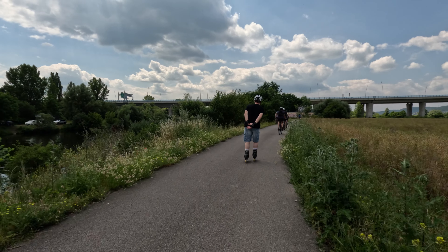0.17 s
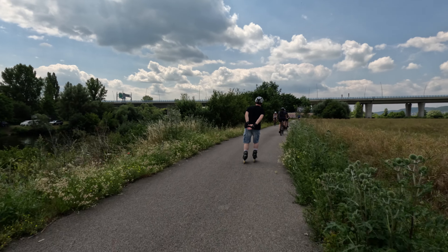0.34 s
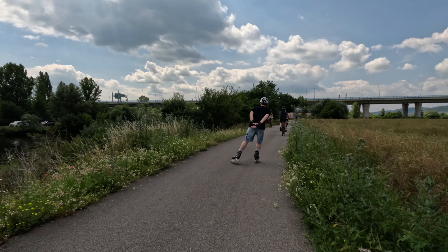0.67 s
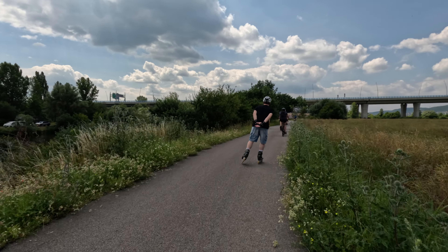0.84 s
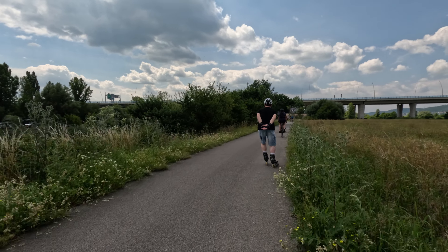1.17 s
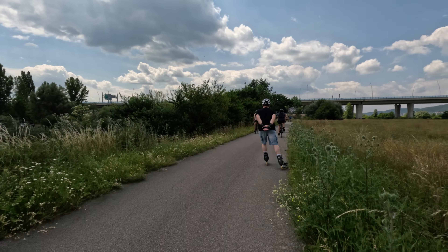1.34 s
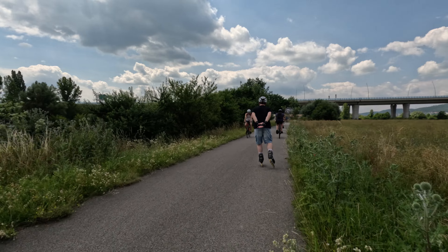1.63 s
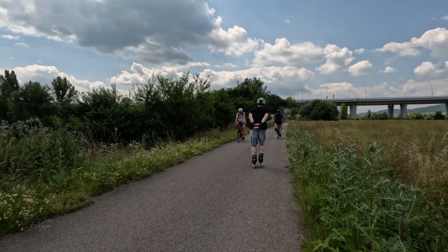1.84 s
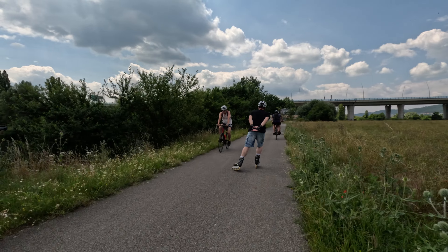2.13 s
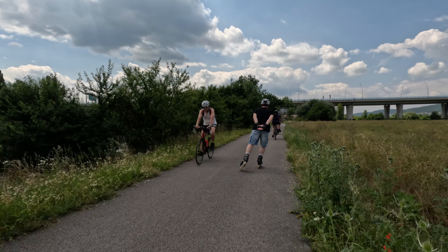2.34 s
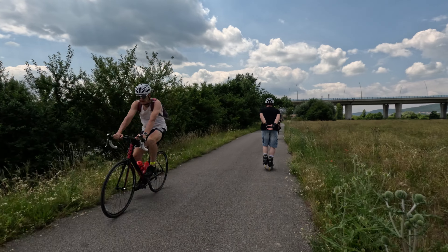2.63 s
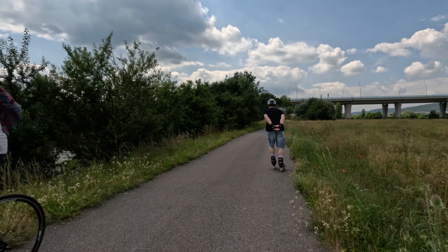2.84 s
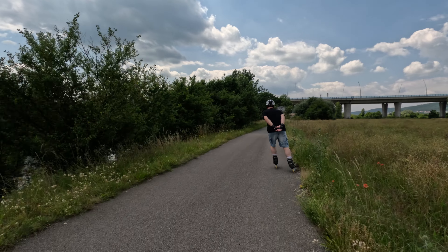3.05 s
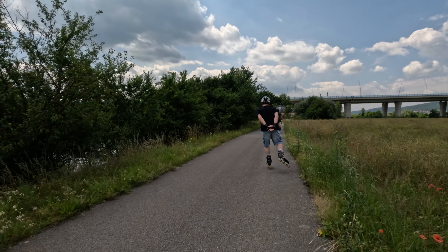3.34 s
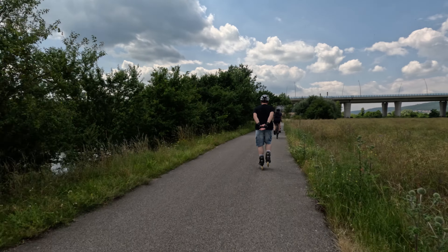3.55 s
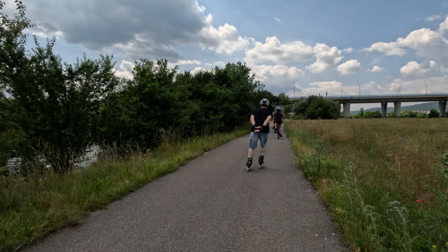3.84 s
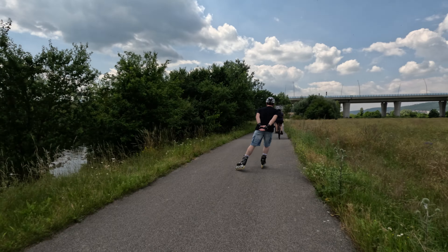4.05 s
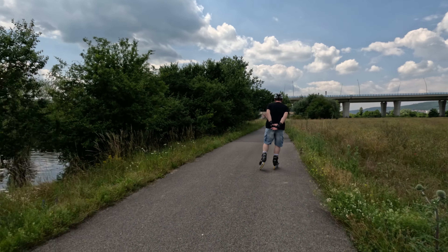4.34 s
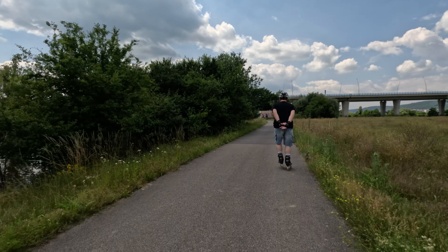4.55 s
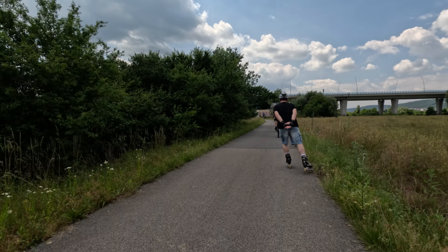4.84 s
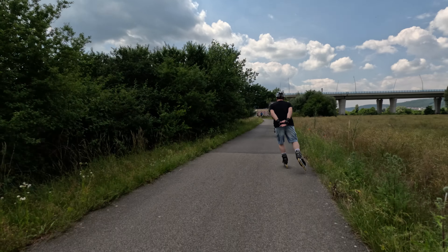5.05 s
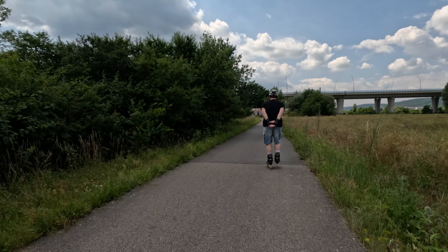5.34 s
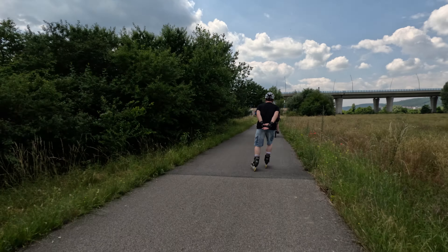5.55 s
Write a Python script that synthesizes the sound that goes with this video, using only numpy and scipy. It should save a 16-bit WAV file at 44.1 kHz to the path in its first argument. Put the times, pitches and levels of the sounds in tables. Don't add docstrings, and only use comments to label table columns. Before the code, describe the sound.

Skate wheels drone and judder along a rough path; loose parts clatter, a sharp jolt jingles thin metal, and tiny bird chips show faintly.

```python
import sys
import numpy as np
from scipy import signal
from scipy.fft import rfft, irfft
from scipy.io import wavfile
from scipy.ndimage import uniform_filter1d

SR = 44100
rng = np.random.default_rng(int(sys.argv[2]) if len(sys.argv) > 2 else 0)


def wav_record(signal):
    frames = np.transpose(np.atleast_2d(signal))
    bounded = np.clip(frames, -1, 1)
    quanta = np.round(bounded * 32767).astype(np.int16)
    wavfile.write(sys.argv[1], SR, quanta)


def field_ratio(decibels):
    return 10 ** (np.asarray(decibels, dtype=float) / 20)


N = 251370
T = np.arange(N) / SR
COARSE = T[::64]

# (time [s], coarseness [dB], unevenness [dB])
ROAD = [(0.1, -39.5, -23), (0.57, -40, -32.5), (0.82, -37.5, -32), (0.87, -36, -20), (1.05, -40, -32),
        (2.11, -39.5, -32.5), (2.29, -37.5, -24), (2.34, -43, -33.5), (2.43, -40, -32), (3.18, -45.5, -26),
        (3.19, -43, -30.5), (4.59, -42.5, -29.5), (5.34, -39, -23), (5.6, -40, -33)]
# (time [s], frequency [Hz])
MAIN_HZ = [(0, 135.3), (.5, 138), (.75, 145), (1.3, 143), (1.65, 146.8), (1.9, 137.4), (2.13, 132.7),
           (2.4, 144), (2.6, 136.9), (2.9, 142), (3.05, 146.2), (3.4, 143.2), (3.7, 139.7), (4.1, 135.9),
           (4.3, 128.3), (4.5, 142.8), (4.75, 137.4), (5.7, 139.8)]
MAIN_WIDTH_HZ, MAIN_STEADY, JUDDER_STEADY = 20.9, 0.41, 0.66
MAIN_DB, JUDDER_DB, FRAME_DB, ROAR_DB, BED_DB, HISS_DB = -20.5, -27, -23.5, -37.5, -22.5, -56.5
# (time [s], gain [dB])
SURGES = [(.76, 3.5), (.95, 4), (1.08, 5), (1.27, 7), (1.4, 4), (1.55, 1), (1.66, 5.5), (1.92, 7),
          (2.11, 0.5), (2.28, 4.5), (2.37, 5), (2.44, 5), (2.57, 1), (2.64, 5), (2.897, 7.5), (3.04, 7),
          (3.12, 6), (3.23, 7.5), (3.4, 6.5), (3.55, 3.5), (3.75, -0.5), (3.93, 4.5), (4.15, 0), (4.66, 4),
          (5.1, 4), (5.32, 2.5), (5.5, 2), (5.65, 7.5), (4.07, 7), (4.5, 6.5), (4.81, 5.5), (4.96, 2)]
# (time [s], loss [dB])
CRACKS = [(.05, 2.5), (.2, 4), (.4, 7.5), (.68, -1.5), (1.45, 0), (1.71, 3.5), (1.78, 10), (2.0, 15),
          (2.21, 10), (2.33, 1.5), (2.51, 9.5), (2.74, 0), (3.185, 7), (3.45, 12), (3.99, 18), (4.3, 0),
          (4.56, 15), (4.61, 11.5), (5.06, 15), (5.25, 8.5), (5.58, -1.5), (4.76, 3), (4.87, 7)]
SURGE_S, CRACK_S = 0.05, 0.02
SURGE_JUDDER, SURGE_FRAME, SURGE_ROAR = -0.41, -0.048, -0.29
CRACK_JUDDER, CRACK_FRAME, CRACK_ROAR = 0.07, 0.1, 0.16
CHOKE_FROM_S, CHOKE_TO_S, CHOKE_DB = 2.916, 2.995, 12.5
# (frequency [Hz], width [Hz], level [dB], left minus right [dB])
FRAME = [(203.9, 27, -3.5, 5), (288.3, 11, -1, -6.5), (315.8, 24, -2, -2.5), (419.7, 48, -4.5, -4),
         (482.6, 52, -5, 2.5), (558.6, 28, -10, -5.5), (710, 120, -8, 2)]
# (frequency [Hz], width [Hz], level [dB], left minus right [dB])
ROAR = [(1080, 272, 5, 3), (1258, 130, -0.5, 3.5), (1450, 230, -3.5, -7), (1657, 170, -0.5, 5.5),
        (2110, 240, -13, -9)]
# (frequency [Hz], density [dB per Hz])
JUDDER = [(8.8, -46.5), (15, -17), (46, 2), (65, 7.5), (82, -3), (102, 6), (110, -16), (140, -46.5),
          (240, -120)]
# (frequency [Hz], density [dB per Hz])
BED = [(59, -33), (100, -7.5), (190, -4), (450, -13.5), (700, -16), (1000, -28.5), (1500, -24.5),
       (2100, -36), (2800, -61.5), (3500, -92)]
# (frequency [Hz], side minus mid [dB])
APART = [(60, -20), (91, -15.5), (140, -23.5), (210, -16.5), (320, -7.5), (490, -13.5), (740, -7.5),
         (1130, -6.5), (1710, -5.5), (2600, -2), (4000, 0.5), (8000, -2), (13000, -1.5)]
# (time [s], length [s], level [dB], frequency [Hz])
PLATE = [(0.013, 0.035, -26, 391.1), (0.135, 0.026, -33, 382.7), (0.33, 0.036, -32.5, 390.9),
         (0.605, 0.076, -26.5, 392.8), (0.845, 0.098, -33.5, 376.7), (1.164, 0.04, -31, 379.6),
         (2.027, 0.026, -33, 392.4), (2.205, 0.049, -34.5, 395.5), (2.806, 0.074, -34.5, 381.3),
         (2.93, 0.068, -27.5, 373.3), (3.154, 0.032, -26, 379.3), (3.514, 0.13, -36.5, 376.8),
         (3.744, 0.087, -31.5, 391.9), (3.911, 0.028, -28, 382.1), (3.983, 0.062, -30.5, 386.8),
         (4.124, 0.03, -26.5, 379.1), (4.209, 0.085, -36.5, 386.0), (4.394, 0.042, -28.5, 358.1),
         (4.555, 0.12, -27.5, 381.0), (4.729, 0.076, -29.5, 382.5), (4.85, 0.035, -29, 382.8),
         (5.022, 0.3, -28.5, 390.0), (5.449, 0.12, -31.5, 368.5)]
PLATE_REST_DB, PLATE_WIDTH_HZ, PLATE_LR_DB = -39, 25.3, -3.5
# (time [s], length [s], level [dB], frequency [Hz])
FORK = [(0.041, 0.065, -28.5, 622.8), (0.168, 0.048, -37, 592.2), (0.484, 0.058, -32, 588.6),
        (0.591, 0.035, -32, 621), (0.663, 0.16, -30.5, 636.3), (0.914, 0.027, -27.5, 609.6),
        (1.114, 0.04, -34, 616.7), (1.203, 0.053, -28.5, 616.9), (1.312, 0.034, -23, 614.1),
        (1.508, 0.13, -37, 605), (1.732, 0.038, -28, 617.3), (1.931, 0.16, -36.5, 609),
        (2.11, 0.066, -37, 635), (2.195, 0.098, -38, 597.1), (2.331, 0.03, -25, 616.5),
        (2.466, 0.097, -36, 617.9), (2.798, 0.06, -34.5, 608.3), (2.919, 0.097, -36, 626.6),
        (3.461, 0.03, -25, 612.4), (3.577, 0.13, -32.5, 623.5), (3.794, 0.028, -31, 625),
        (3.956, 0.047, -25.5, 613.6), (4.039, 0.24, -33.5, 600.6), (4.355, 0.038, -28, 599.9),
        (4.436, 0.058, -32, 618), (4.746, 0.066, -29, 604), (4.896, 0.047, -28.5, 613.4),
        (4.986, 0.04, -25.5, 602), (5.054, 0.034, -29.5, 623), (5.327, 0.045, -30, 628.4),
        (5.493, 0.059, -34, 629)]
FORK_REST_DB, FORK_WIDTH_HZ, FORK_LR_DB = -36.5, 21, -1
# (time [s], length [s], level [dB], frequency [Hz])
STEM = [(0.133, 0.069, -25, 268), (0.256, 0.13, -25.5, 227), (0.408, 0.3, -25.5, 233),
        (0.774, 0.044, -17.5, 234.4), (0.888, 0.072, -28, 240.3), (1.005, 0.17, -24, 234.9),
        (1.313, 0.029, -27.5, 233.4), (1.362, 0.084, -27, 244.3), (1.542, 0.078, -23.5, 227.5),
        (1.691, 0.12, -27.5, 245.3), (1.853, 0.053, -29, 232.8), (1.958, 0.16, -25.5, 246.6),
        (2.162, 0.034, -21.5, 253.5), (2.231, 0.126, -31.5, 250), (2.541, 0.072, -28, 263),
        (2.785, 0.033, -20.5, 224.6), (2.852, 0.064, -19.5, 237.1), (2.974, 0.03, -29.5, 272.3),
        (3.548, 0.06, -29, 237.7), (3.835, 0.055, -25, 222), (3.97, 0.036, -18.5, 246.7),
        (4.117, 0.034, -19, 238.1), (4.298, 0.066, -21.5, 225), (4.447, 0.039, -19, 209.7),
        (4.57, 0.096, -30.5, 245), (4.965, 0.05, -21.5, 255), (5.298, 0.088, -23.5, 246.2)]
STEM_REST_DB, STEM_WIDTH_HZ, STEM_LR_DB = -31.5, 22.7, 0.5
# (time [s], length [s], level [dB], frequency [Hz])
HUB = [(0.214, 0.054, -39.5, 1685), (0.297, 0.06, -43, 1668), (0.365, 0.082, -46.5, 1668),
       (0.457, 0.074, -43, 1678), (0.542, 0.1, -45, 1687), (0.721, 0.088, -44.5, 1681),
       (0.827, 0.031, -49, 1677), (0.877, 0.038, -45.5, 1679), (0.934, 0.041, -40.5, 1650),
       (1.032, 0.04, -42.5, 1689), (1.185, 0.076, -44, 1675), (1.436, 0.032, -44, 1667),
       (1.473, 0.031, -43, 1683), (1.545, 0.06, -48.5, 1680), (1.697, 0.068, -42.5, 1702),
       (1.795, 0.12, -43.5, 1674), (1.978, 0.14, -43.5, 1700), (2.155, 0.138, -43, 1680),
       (2.386, 0.034, -46, 1665), (2.525, 0.054, -40, 1686), (2.714, 0.054, -42, 1719),
       (2.837, 0.058, -43, 1650), (2.907, 0.15, -41.5, 1646), (3.127, 0.036, -44.5, 1641),
       (3.311, 0.174, -42, 1671), (3.592, 0.08, -43.5, 1682), (3.696, 0.076, -47.5, 1682),
       (3.795, 0.03, -43.5, 1654), (3.872, 0.086, -43, 1707), (3.968, 0.042, -43, 1643),
       (4.042, 0.036, -44, 1693), (4.129, 0.038, -41.5, 1680), (4.232, 0.078, -42, 1690),
       (4.368, 0.03, -44.5, 1666), (4.408, 0.04, -42.5, 1690), (4.724, 0.039, -44, 1710),
       (4.911, 0.052, -43, 1680), (5.069, 0.042, -44, 1646), (5.197, 0.092, -44.5, 1670),
       (5.276, 0.102, -41, 1712)]
HUB_REST_DB, HUB_WIDTH_HZ, HUB_LR_DB = -50, 80, 4
SING_EDGE_S, SING_STEADY = 0.016, 0.75
# (time [s], peak [dB])
BUMPS = [(0.095, -40.5), (0.396, -38), (0.7691, -43.5), (1.365, -38.5), (1.741, -33), (2.0002, -52),
         (2.171, -44.5), (2.47, -47.5), (3.851, -42.5), (3.95, -41.5), (4.0287, -39), (4.578, -45.5),
         (4.645, -50.5), (4.769, -44.5), (4.99, -42.5), (5.078, -42), (5.13, -46), (5.186, -44),
         (5.229, -38.5), (5.551, -40.5)]
BUMP_THUD_DB, BUMP_BRIGHT_DB, BUMP_S = 21.5, -19, 0.038
# (time [s], peak [dB], thud [dB], bright share [dB])
JOLT = [(2.6494, -44.5, 9, -5.5), (2.724, -29, 9, -33.5), (2.795, -39, 24.5, -18.5),
        (2.818, -36.5, 22.5, -14), (2.745, -46, 12.5, -29), (2.896, -30.5, 2.5, -5.5),
        (2.9127, -21, 20, -16), (2.939, -28.5, 23, -9.5), (2.959, -35, 15, -14.5),
        (2.976, -33.5, 12.5, -12.5), (2.996, -35, 16.5, -18), (3.037, -34.5, -2.5, -4.5),
        (3.0743, -30.5, 5.5, -13.5), (3.145, -28.5, 23.5, -10.5), (3.164, -39.5, 23.5, -13),
        (3.185, -40.5, 25, -15), (3.204, -40.5, -1, -26), (3.268, -38, 3, -5.5), (3.285, -46, 20.5, -15.5),
        (3.322, -39.5, 27, -25.5)]
JOLT_S = 0.03
# (frequency [Hz], density [dB per Hz])
CLATTER = [(900, -19), (1800, 3.5), (2700, 1), (3300, -6), (4000, -8), (5500, -11), (7500, -22.5),
           (10000, -47.5)]
# (frequency [Hz], density [dB per Hz])
JINGLE = [(4000, -22.5), (6300, -1.5), (7000, 0), (8800, -9), (10000, -2), (11500, -13), (12000, -24),
          (16000, -50.5)]
# (frequency [Hz], density [dB per Hz])
THUD = [(150, -19), (300, 0.5), (500, 9.5), (700, 11), (1000, 1.5), (1450, -0.5), (2100, -20.5),
        (3000, -44.5)]
# (time [s], frequency [Hz], level [dB], t60 [s])
BLOWS = [(1.762, 1135, -26, .05), (2.725, 1773, -26, 0.038), (2.728, 2646, -34.5, 0.06),
         (2.748, 1810, -28, .04), (2.749, 2740, -39.5, .06), (2.889, 268, -13.5, 0.16),
         (2.918, 2100, -27.5, 0.073), (2.92, 740, -18.5, 0.053), (2.922, 338, -17, 0.053),
         (2.93, 986, -17.5, .05), (2.938, 730, -21.5, .05), (2.951, 1430, -25, 0.036),
         (2.947, 556, -23, 0.05), (2.95, 1360, -25, 0.0399), (2.955, 510, -15, 0.098),
         (2.961, 743.5, -20.5, .04), (2.979, 248, -10.5, 0.13), (2.982, 606, -12.5, 0.033),
         (2.787, 259, -14.5, 0.09), (2.8, 621, -25, 0.054), (2.856, 624, -19.5, 0.068),
         (3.008, 694, -20.5, .05), (2.984, 925, -20, 0.048), (3.165, 1450, -26, 0.12),
         (3.168, 690, -21, 0.072), (3.172, 2040, -33.5, 0.072)]
# (time [s], frequency [Hz], level [dB], t60 [s])
PINGS = [(2.903, 7750, -51, .06), (2.912, 8600, -52, .08), (2.915, 6300, -45, .15), (2.945, 6150, -45, .15),
         (2.985, 6150, -48, .1), (3.048, 6450, -48, .15), (3.075, 6170, -49, .15), (3.048, 9950, -55, .2),
         (3.156, 7450, -55, .15), (3.2, 7450, -61, .15), (3.264, 4900, -54, .08), (3.282, 6400, -47, .1),
         (3.272, 10000, -56, .1), (2.985, 3213, -45, .3), (3.018, 3213, -48, .3)]
# (time [s], peak [dB], frequency [Hz])
KNOCKS = [
    (1.318, -19.5, 610),
    (1.623, -18.5, 641),
    (2.421, -13, 504),
    (4.046, -10.5, 538),
    (4.526, -24.5, 603),
    (4.909, -20.5, 626),
    (5.214, -13, 601),
]
KNOCK_T60_S, KNOCK_DB = 0.03, -5
DISC_HZ = [915, 1621, 2396, 3213, 4238, 6152, 6400, 7452, 8650, 9895, 11420]
# (level [dB], t60 [s], left minus right [dB])
DISC = [(-2, 5, 13), (0.5, 0.55, 11), (3, 0.54, 2), (-3, 0.2, -5), (-2, 0.26, 13), (-4.5, 0.12, 1),
        (-9, 0.075, -4), (-9, 0.18, -1), (-9.5, 0.08, -3), (-9.5, .055, -2), (-8.5, 0.05, -4)]
# (time [s], low modes [dB], high modes [dB])
RATTLE = [(2.905, -62.5, -50), (2.916, -46.5, -39), (2.947, -40, -42), (2.984, -52.5, -43.5),
          (3.051, -43.5, -45.5), (3.066, -52, -50.5), (3.14, -47, -51), (3.171, -43.5, -59),
          (3.206, -58.5, -58.5), (3.276, -58.5, -49.5), (3.297, -60, -53.5), (3.335, -61.5, -58.5),
          (3.35, -63, -62)]
RATTLE_S, REST_S, JOG_RAD = 0.019, 3.42, 0.65
# (time [s], length [s], loss [dB])
TOUCHES = [
    (2.952, .012, 4),
    (3.02, .022, -2),
    (3.116, .025, -2),
    (3.222, 0.044, 7.5),
]
# (time [s], length [s], level [dB], fading [dB per s])
CHINKS = [(2.907, .012, -40.5, 2), (2.915, .036, -35, 0), (2.962, .02, -49, 3), (2.987, .016, -38, 100),
          (3, .03, -43.5, 150), (3.036, .018, -51.5, 0), (3.056, .04, -42, 100), (3.099, .015, -52.5, 100),
          (3.14, .012, -51, 0), (3.151, .025, -45, 0), (3.18, .014, -58.5, 0), (3.197, .027, -53, 0),
          (3.268, .014, -52.5, 0), (3.284, .03, -48, 0), (3.314, 0.032, -52.5, 50), (3.356, .02, -60, 200)]
CHINK_HZ, CHINK_EDGE_S, CHINK_WANDER_HZ, CHINK_LR_DB = 5232, 0.0035, 30, -3
# (frequency [Hz], density [dB per Hz])
HISS = [(1500, -10.5), (2500, -7), (3500, -2.5), (5000, -5.5), (7000, -7), (8500, -11), (10500, -15.5),
        (12500, -20), (15000, -23.5), (15700, -16), (17000, -42)]
# (multiple of BUZZ_HZ, level [dB])
BUZZ = [(13, -80), (14, -80), (16, -79), (17, -80), (19, -75), (20, -75), (52, -85)]
BUZZ_HZ = 300
# (time [s], length [s], start frequency [Hz], end frequency [Hz], level [dB])
CHIPS = [
    (1.393, .028, 4920, 4850, -57),
    (1.77, .025, 5150, 4800, -54),
    (1.783, .013, 4600, 4500, -56),
    (4.995, .068, 4920, 4880, -56.5),
]
# (time [s], length [s], start frequency [Hz], end frequency [Hz], level [dB])
CHURRS = [
    (.862, .045, 4900, 4950, -57),
    (1.553, .045, 5750, 5500, -61),
    (1.735, .025, 4800, 4950, -55),
    (5.183, .048, 4800, 5000, -57),
    (5.232, .04, 4950, 5000, -57),
    (5.548, .03, 5000, 4950, -57),
]
WARBLE_HZ, CHURR_HZ = 120, 340


def unit(x):
    return x / np.sqrt(np.mean(x ** 2))


def on_log(hz, table):
    at, value = np.transpose(table)
    return np.interp(np.log(hz + 1), np.log(at), value)


def shaped(x, table):
    gain = field_ratio(on_log(np.fft.rfftfreq(N, 1 / SR), table))
    return irfft(rfft(x) * gain, N)


def colour(x, table):
    return unit(shaped(x, table))


def pair(make):
    side = shaped(make(), APART)
    return make() + side * np.array([[1], [-1]])


def pan(lr_db):
    return field_ratio(np.array([[lr_db], [-lr_db]]) / 2)


def walk(rate):
    k = int(SR / rate)
    steps = np.repeat(rng.standard_normal(N // k + 1), k)
    return unit(uniform_filter1d(uniform_filter1d(steps, k), k)[:N])


def held(start, length, edge_s):
    rise = np.tanh((COARSE - start) / edge_s)
    fall = np.tanh((COARSE - start - length) / edge_s)
    return (rise - fall) / 2


def humps(table, width_s):
    return np.interp(T, COARSE, sum(db * np.exp(-((COARSE - s) / width_s) ** 2) for s, db in table))


def burst(s, length):
    out, first = np.zeros(N), int(s * SR) + 1
    age = T[first:first + SR // 4] - s
    rise = 1 - np.exp(-age / 0.0068)
    out[first:first + len(age)] = rise * np.exp(-(age / max(length, 0.005)) ** 1.15)
    return out


def even_out(x, share, seconds):
    swing = np.sqrt(uniform_filter1d(unit(x.mean(axis=0)) ** 2, int(seconds * SR)) + 0.01)
    return unit(x / swing ** np.clip(share, 0, 1))


def stones(per_s, spread_db):
    hits = rng.random(N) < per_s / SR
    return hits * rng.standard_normal(N) * field_ratio(spread_db * rng.exponential(size=N))


def coarseness_db(axis=1):
    road_db = np.interp(T, np.transpose(ROAD)[0], np.transpose(ROAD)[axis])
    return road_db - np.median(road_db)


def resonance(x, hz, width):
    lead = np.concatenate([x[..., -SR // 8:], x], axis=-1)
    return signal.lfilter(*signal.iirpeak(hz, hz / width, SR), lead)[..., -N:]


def drifting(hz, width):
    keep = np.exp(-np.pi * width / SR)
    count = N + SR // 4
    drive = rng.standard_normal(count) + 1j * rng.standard_normal(count)
    swing = signal.lfilter([1], [1, -2 * keep, keep ** 2], drive)[-N:]
    return unit(np.real(swing * np.exp(2j * np.pi * np.cumsum(hz) / SR)))


def main_mode():
    ring = pair(lambda: drifting(np.interp(T, *np.transpose(MAIN_HZ)), MAIN_WIDTH_HZ))
    return even_out(ring, MAIN_STEADY, 0.027)


def modes(table, flicker_db, rate):
    road = pair(lambda: stones(6000, 0.8))
    out = 0
    for hz, width, db, lr in table:
        ring = resonance(resonance(road, hz, 1.8 * width), hz, 1.68 * width)
        out = out + pan(lr) * field_ratio(db + flicker_db * walk(rate)) * unit(ring)
    return unit(out)


def singing(table, rest_db, width, lr_db):
    start, length, db, hz = np.transpose(table)
    swells = sum(field_ratio(d) * held(s, n, SING_EDGE_S) for s, n, d in zip(start, length, db))
    size = field_ratio(rest_db) + np.interp(T, COARSE, swells)
    ring = pair(lambda: drifting(np.interp(T, start + length / 2, hz), width))
    return size * pan(lr_db) * even_out(ring, SING_STEADY, 0.05)


def rolling():
    road_db = coarseness_db()
    surge, crack = humps(SURGES, SURGE_S), humps(CRACKS, CRACK_S)
    choke = np.interp(T, COARSE, held(CHOKE_FROM_S, CHOKE_TO_S - CHOKE_FROM_S, 0.0026))
    main_db = MAIN_DB + surge - crack - CHOKE_DB * choke
    judder_db = JUDDER_DB + SURGE_JUDDER * surge + CRACK_JUDDER * crack
    judder_db = judder_db + 0.5 * coarseness_db(axis=2) + 0.42 * walk(12)
    frame_db = FRAME_DB + 0.4 * road_db + SURGE_FRAME * surge + CRACK_FRAME * crack + 0.3 * walk(20)
    grit_db = 0.27 * road_db + SURGE_ROAR * surge + CRACK_ROAR * crack + 0.21 * walk(8.6)
    bed_db = BED_DB + 0.69 * grit_db + 1.5 * walk(6.34)

    main = field_ratio(main_db) * main_mode()
    judder = even_out(pair(lambda: colour(rng.standard_normal(N), JUDDER)), JUDDER_STEADY, 0.11)
    frame = field_ratio(frame_db) * modes(FRAME, 1.4, 12)
    roar = field_ratio(ROAR_DB + grit_db) * modes(ROAR, 0.95, 16)
    bed = unit(pair(lambda: colour(stones(9000, 1.8), BED)))
    plate = singing(PLATE, PLATE_REST_DB, PLATE_WIDTH_HZ, PLATE_LR_DB)
    fork = singing(FORK, FORK_REST_DB, FORK_WIDTH_HZ, FORK_LR_DB)
    stem = singing(STEM, STEM_REST_DB, STEM_WIDTH_HZ, STEM_LR_DB)
    return main + field_ratio(judder_db) * judder + frame + plate + fork + stem + roar + field_ratio(bed_db) * bed


def hub():
    return singing(HUB, HUB_REST_DB, HUB_WIDTH_HZ, HUB_LR_DB)


def bumps():
    shake = sum(field_ratio(db) * burst(s, BUMP_S) for s, db in BUMPS)
    bright, thud = shake * field_ratio(BUMP_BRIGHT_DB), shake * field_ratio(BUMP_THUD_DB)
    for s, db, thud_db, bright_db in JOLT:
        size = field_ratio(db) * burst(s, JOLT_S)
        shake = shake + size
        bright = bright + size * field_ratio(bright_db)
        thud = thud + size * field_ratio(thud_db)
    clatter = pair(lambda: colour(stones(5000, 0.71), CLATTER)) * shake * field_ratio(-6.5)
    jingle = pair(lambda: colour(stones(5500, 1.6), JINGLE)) * bright * field_ratio(-6)
    knock = pair(lambda: colour(stones(3300, 0.61), THUD)) * thud * field_ratio(-13.0)
    return clatter + jingle + knock


def blows():
    out = np.zeros(N)
    knocks = [(s, hz, db + KNOCK_DB, KNOCK_T60_S) for s, db, hz in KNOCKS]
    for s, hz, db, t60 in BLOWS + PINGS + knocks:
        span = slice(int(s * SR) + 1, int(s * SR) + SR // 4)
        age = T[span] - s
        out[span] += field_ratio(db - 60 * age / t60) * np.sin(2 * np.pi * hz * age)
    return out * pan(0.3)


def disc():
    low = sum(field_ratio(low_db) * burst(s, RATTLE_S) for s, low_db, high_db in RATTLE)
    high = sum(field_ratio(high_db) * burst(s, RATTLE_S) for s, low_db, high_db in RATTLE)
    touch_db = np.interp(T, COARSE, sum(db * held(s, length, 0.006) for s, length, db in TOUCHES))
    out = 0
    for hz, (db, t60, lr) in zip(DISC_HZ, DISC):
        share = np.clip((hz - 2400) / 2800, 0, 1)
        strike = (1 - share) * low + share * high
        keep = np.exp(-2 * np.log(1000) / (t60 * SR))
        swing = np.sqrt(signal.lfilter([1], [1, -keep], strike ** 2))
        kicks = np.cumsum(rng.standard_normal(N) * strike / (swing + 1e-9))
        jog = uniform_filter1d(kicks, size=60) * JOG_RAD
        settle_db = -70 * share * np.clip(T - REST_S, 0, None) - min(1.5 * share, 1) * touch_db
        size = field_ratio(db + 1.2 * walk(30)) * swing * field_ratio(settle_db)
        out = out + pan(lr) * size * np.sin(2 * np.pi * hz * T + jog)
    return out * field_ratio(-20.5)


def chinks():
    size = 0
    for s, length, db, fade_db in CHINKS:
        fading = field_ratio(db - fade_db * np.clip(COARSE - s, 0, length))
        size = size + fading * held(s, length, CHINK_EDGE_S)
    phase = 2 * np.pi * np.cumsum(CHINK_HZ + CHINK_WANDER_HZ * walk(70)) / SR
    return pan(CHINK_LR_DB) * np.interp(T, COARSE, size) * field_ratio(2.2 * walk(150)) * np.sin(phase)


def hiss():
    buzz = sum(field_ratio(db) * np.sqrt(2) * np.sin(2 * np.pi * BUZZ_HZ * k * T) for k, db in BUZZ)
    noise = unit(pair(lambda: colour(stones(12000, 1.4), HISS)))
    return field_ratio(HISS_DB + 0.72 * coarseness_db() + 1.3 * walk(29)) * noise + buzz


def birds():
    out, warble, flutter_db = np.zeros(N), walk(1300), 3 * walk(300)
    for table, warble_hz in ((CHIPS, WARBLE_HZ), (CHURRS, CHURR_HZ)):
        for s, length, hz0, hz1, db in table:
            span = slice(int(s * SR), int((s + length) * SR))
            part = np.clip((T[span] - s) / length, 0, 1)
            hz = hz0 + (hz1 - hz0) * part + warble_hz * warble[span]
            phase = 2 * np.pi * np.cumsum(hz) / SR
            size = field_ratio(db + 3 + flutter_db[span]) * np.abs(np.sin(np.pi * part)) ** 0.6
            out[span] += size * (np.sin(phase) + field_ratio(-16) * np.sin(2 * phase))
    return out * pan(1.5)


def scene():
    dull = signal.butter(10, 11800, fs=SR, output="sos")
    loose = signal.sosfilt(dull, bumps() + disc())
    return rolling() + hub() + loose + blows() + chinks() + hiss() + birds()


def low_pass(x):
    return signal.sosfilt(signal.butter(12, 15720, fs=SR, output="sos"), x)


def record(dry):
    soft = np.tanh(1.1 * dry) / 1.1
    return low_pass(soft)


dry = scene()
out = record(dry)
wav_record(out)
```